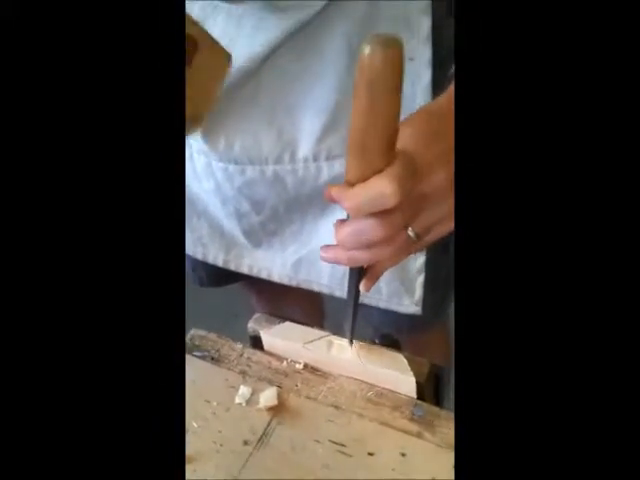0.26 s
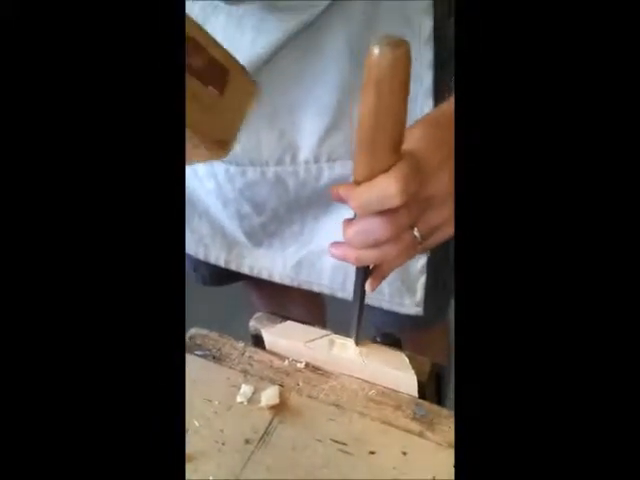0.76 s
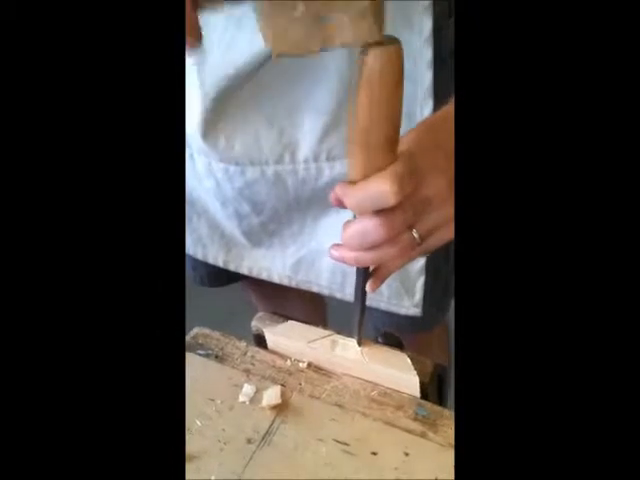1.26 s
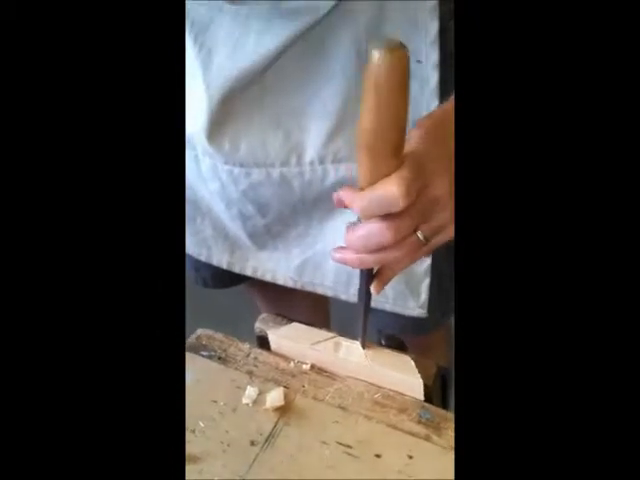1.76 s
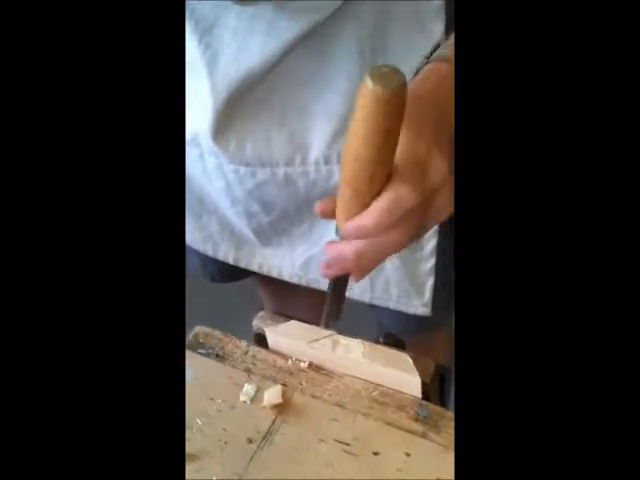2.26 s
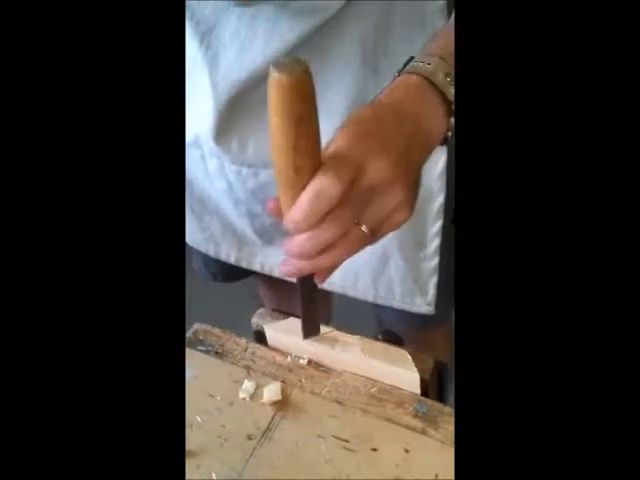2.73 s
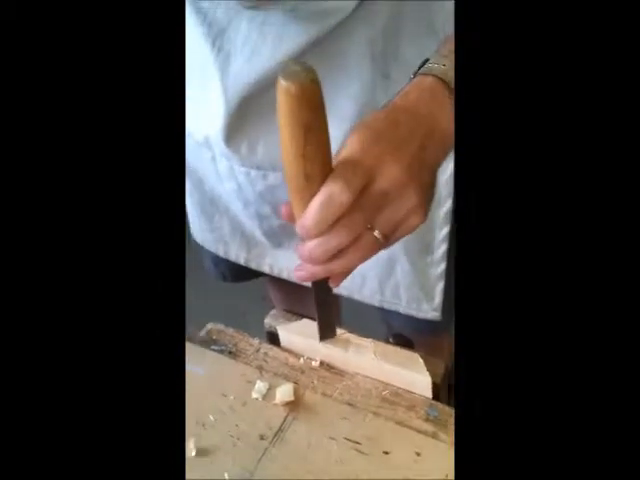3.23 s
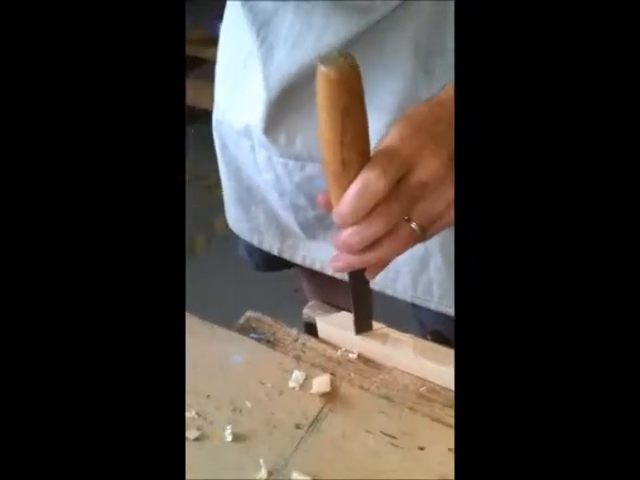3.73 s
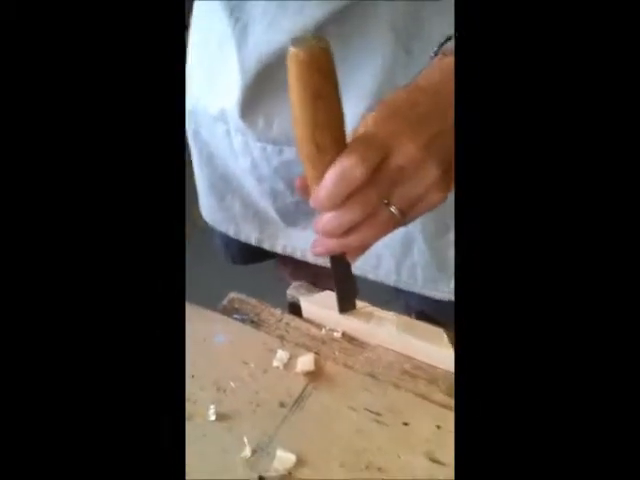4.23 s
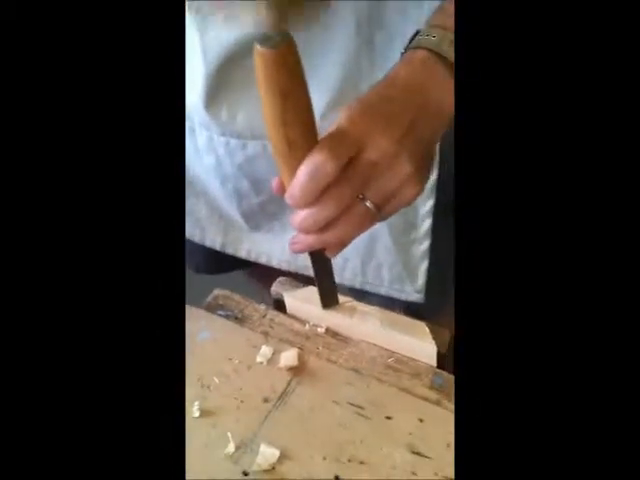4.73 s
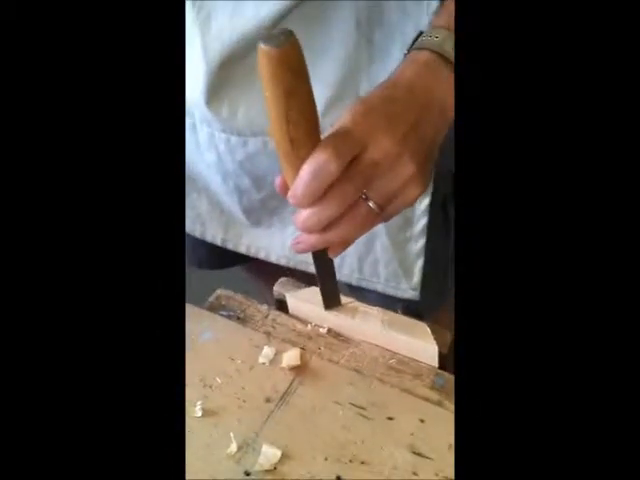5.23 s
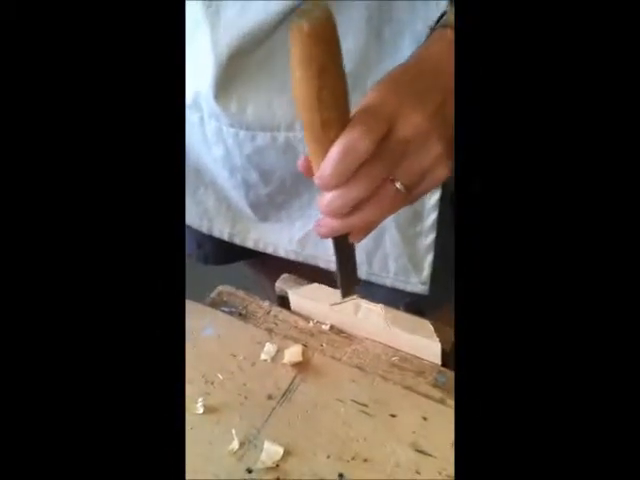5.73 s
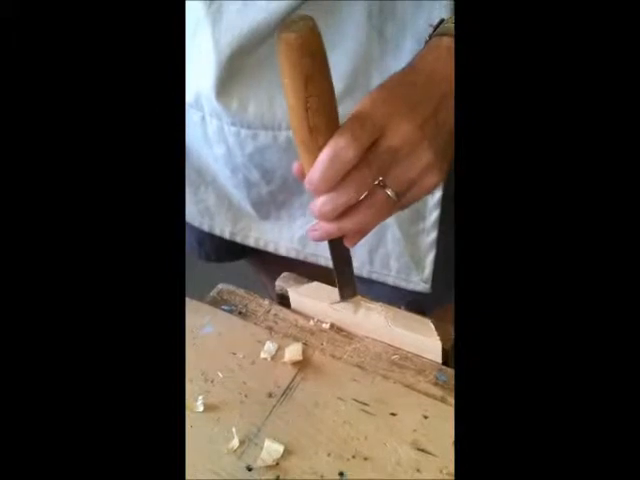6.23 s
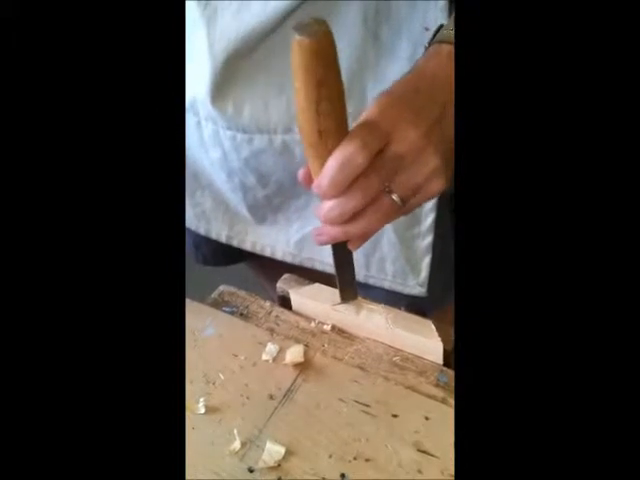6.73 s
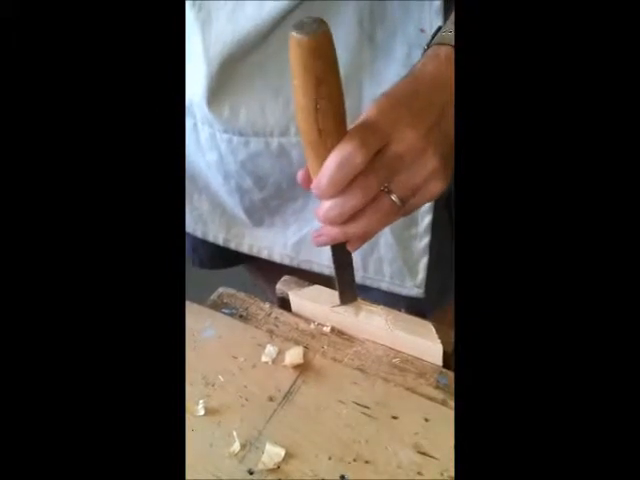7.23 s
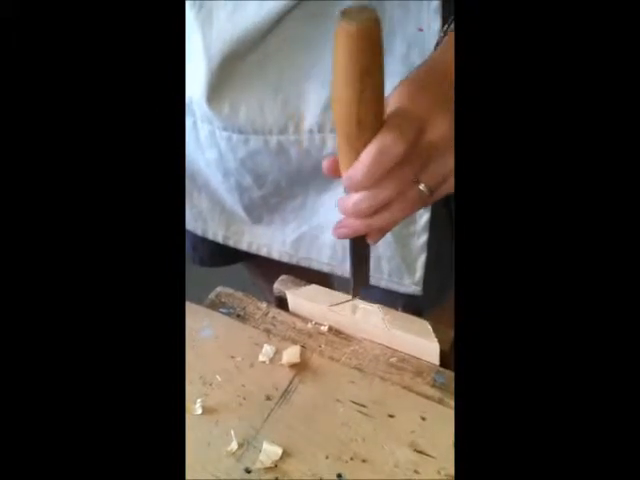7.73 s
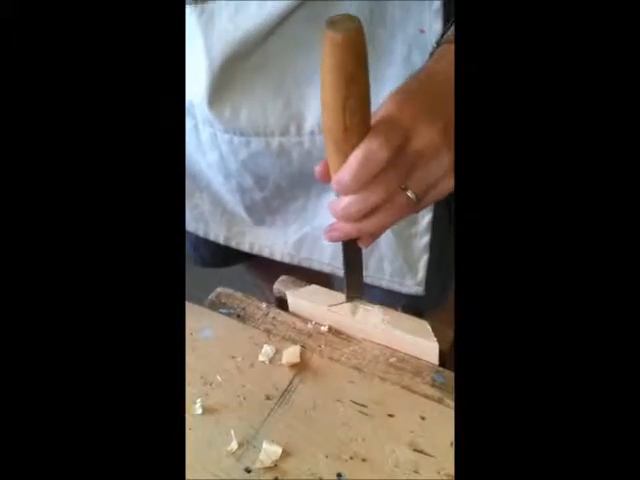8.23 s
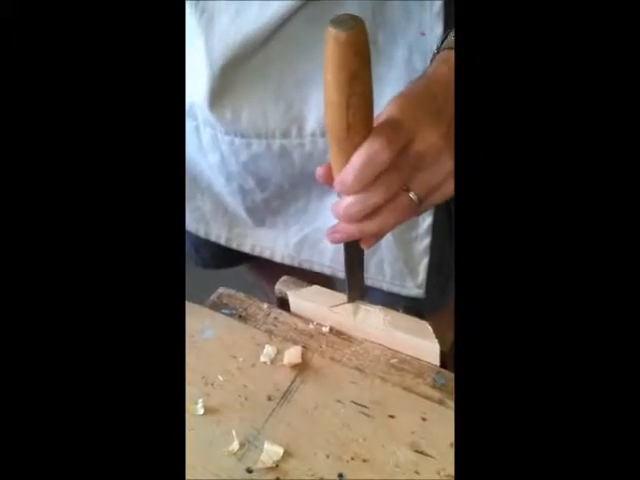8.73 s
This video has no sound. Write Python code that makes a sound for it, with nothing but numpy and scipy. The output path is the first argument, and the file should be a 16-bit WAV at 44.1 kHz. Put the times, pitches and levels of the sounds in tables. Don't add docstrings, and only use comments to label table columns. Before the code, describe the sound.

Hard mallet blows on a wooden chisel ring through a bench in an echoing little workshop, loudest peaks overdriven, soft tool taps between groups.

```python
import sys
import numpy as np
from scipy import signal
from scipy.fft import rfft, irfft, next_fast_len
from scipy.io import wavfile
from scipy.ndimage import uniform_filter1d

SR = 44100
rng = np.random.default_rng(int(sys.argv[2]) if len(sys.argv) > 2 else 0)


def materialize(psi):
    bounded = np.clip(np.atleast_2d(psi).T, -1, 1)
    quanta = np.round(bounded * 32767).astype(np.int16)
    wavfile.write(sys.argv[1], SR, quanta)


def level_to_linear(level):
    exponent = np.asarray(level, float) / 20
    return 10 ** exponent


N = 396018
LEAD = 8820


def blow(force_db, tilt_db):
    # [f/Hz, level/dB, time to fall 60 dB/s]
    wood_modes = [(139, -37, 0.11), (316, -0.5, 0.058), (400, -3, 0.077), (578, -13.5, .06),
                  (672, -6.5, 0.054), (817, -3, 0.063), (1075, -9, 0.034), (1615, -10, 0.0088),
                  (2700, -10, .03), (4540, -10, 0.013), (5500, -17, 0.012)]
    boom_db = -6.5 + 0.23 * force_db
    vary_db = 2.5
    wood = np.zeros(4096)
    for hz, db, t60 in wood_modes:
        shift, vary = rng.standard_normal(2)
        low_db = boom_db / (1 + (hz / 450) ** 4)
        mode = ring(hz * (1 + 0.015 * shift), t60 * 0.43, size=4096)
        wood += level_to_linear(db + low_db + vary_db * vary) * mode
    snap = crack(tilt_db, t60=0.0049, splinter_db=-17.5)
    return level_to_linear(force_db) * (level_to_linear(-2) * loaded(wood) + level_to_linear(19) * snap)


def crack(tilt_db, t60, splinter_db):
    t = np.arange(4096) / SR
    burst = rng.standard_normal(4096) * level_to_linear(splinter_db - 60 * t / t60)
    burst[4] = 0.78
    return coloured(burst, tilt_db)


def handle(force_db, shaft_hz, handle_db):
    # [f/Hz, level/dB]
    upper_rings = [(1580, 2.5), (3000, -0.5), (4050, -5)]
    shaft_db, shaft_t60, vary_db = 5, 0.017, 2.5
    handle_hz = 2300 + 0.47 * (shaft_hz - 880)
    rings = level_to_linear(handle_db + 7) * ring(handle_hz, t60=0.02, size=4096)
    rings += level_to_linear(shaft_db) * ring(shaft_hz, shaft_t60, size=4096)
    for hz, db in upper_rings:
        shift, vary = rng.standard_normal(2)
        rings += level_to_linear(db + vary_db * vary) * ring(hz * (1 + 0.02 * shift), shaft_t60, size=4096)
    return level_to_linear(force_db - 2) * loaded(rings)


def splinters(force_db, tilt_db):
    t = np.arange(2048) / SR
    fade = level_to_linear(-60 * (t / 0.02) ** 2) * np.clip(t / 0.0024, 0, 1)
    tear = rng.standard_normal((2, len(t))) * fade
    return level_to_linear(force_db - 1.5) * np.array([coloured(side, tilt_db - 0.5) for side in tear])


def buzz(loose):
    # [f/Hz, twin f/Hz, time to fall 60 dB/s]
    steel_pairs = [(3960, 4060, .09), (7636, 7574, .2), (12340, 12270, .19)]
    tight_db = (-38, -34, -40.5)
    added_db = (11.5, 17.5, 17)
    t = np.arange(16000) / SR
    clicks = (rng.random(len(t)) < 900 / SR) * rng.standard_normal(len(t))
    chatter_s = 0.066 + 0.07 * loose
    chatter = clicks / (1 + (t / chatter_s) ** 8)
    rattle_db = -21 + 8.5 * loose
    out = level_to_linear(rattle_db + 10.5) * coloured(chatter, -1.2)
    for db, more_db, (hz, twin_hz, t60) in zip(tight_db, added_db, steel_pairs):
        steel = ring(hz, t60, size=len(t)) + 0.6 * ring(twin_hz, t60, size=len(t))
        pair = signal.fftconvolve(chatter, steel)[:len(t)]
        out += level_to_linear(db + more_db * loose + 5) * pair / abs(pair).max()
    return out


def knock(db, hz, t60, tilt_db):
    rise = np.clip(np.arange(4096) / SR / 0.0005, 0, 1)
    body = rise * ring(hz, t60 * 0.56, size=4096)
    tick = crack(tilt_db, t60=0.0047, splinter_db=-26.5)
    return level_to_linear(db - 2.5) * (body + level_to_linear(10) * tick)


def add_vise_hum(mix):
    # [t/s, f/Hz, level/dB, time to fall 60 dB/s]
    iron_hum = (7.87, 447, -46, 2.5)
    s, hz, db, t60 = iron_hum
    add(mix, s, level_to_linear(db) * ring(hz, t60, size=SR + LEAD) * np.ones((2, 1)))


def in_room(dry, wet_db, early, count=440):
    # [f/Hz, time to fall 60 dB/s]
    room_t60 = [(70, 0.21), (130, 0.88), (260, 0.66), (700, 0.47), (1800, 0.53), (5000, 0.48), (8000, 0.5),
                (12000, 0.5)]
    # [f/Hz, likeness -1 to 1]
    room_same = [(60, .5), (160, 0.85), (300, 0.64), (600, 0.36), (1500, .1), (12000, 0.18)]
    hz, z = pair_noise(frames=count, size=256, same=room_same)
    t = np.arange(z.shape[-1]) * 64 / SR
    decay = level_to_linear(-60 * t / read(room_t60, hz)[:, None])
    near = 1 + early * np.exp(-t / 0.0072)
    tail = signal.istft(z * decay * near, nperseg=256, noverlap=192)[1]
    tail = level_to_linear(wet_db) * tail / np.linalg.norm(tail[0])
    tail[0, 0] = tail[1, 3] = 1
    return signal.fftconvolve(dry[None], tail, axes=1)


def floor():
    # [f/Hz, level/dB per Hz]
    floor_colour = [(18, -44.5), (53, -7), (87, -1.5), (220, -6.5), (260, -15.5), (420, -11), (750, -17),
                    (4910, -24.5)]
    # [f/Hz, likeness -1 to 1]
    floor_same = [(60, -0.65), (180, 0.79), (540, 0.21), (1640, 0.51), (4930, -0.16), (14900, 0.29)]
    # [f/Hz, left over right/dB]
    floor_lean = [(60, 1), (180, 4), (540, 2.5), (1640, 2), (4930, 1), (14900, 1)]
    hz, z = pair_noise(frames=N // 256 + 5, size=1024, same=floor_same)
    patches = rng.standard_normal(z.shape[:0:-1]).T
    patches = uniform_filter1d(patches, 12, 0)
    patches = evened(uniform_filter1d(patches, 30, 1))
    sides = np.array([0.5, -0.5])[:, None, None]
    level_db = read(floor_colour, hz)[:, None] + 1.1 * patches + read(floor_lean, hz)[:, None] * sides
    hiss = signal.istft(z * level_to_linear(level_db), nperseg=1024, noverlap=768)[1][:, :N]
    return level_to_linear(-57) * evened(hiss)


def coloured(x, tilt_db):
    # [f/Hz, level/dB per Hz]
    crack_colour = [(30, -56.5), (200, -16.5), (320, -2.5), (500, -12), (900, -3), (4000, -14),
                    (9500, -28.5), (15000, -47)]
    hz = np.fft.rfftfreq(4096, 1 / SR)
    octaves = np.log2(np.clip(hz, 150, 12000) / 1000)
    gain = np.log(level_to_linear(read(crack_colour, hz) + tilt_db * octaves))
    mirrored = np.r_[gain, gain[-2:0:-1]]
    causal = np.exp(np.conj(signal.hilbert(mirrored)))[:len(hz)]
    click = irfft(causal)
    return signal.fftconvolve(x, click / np.linalg.norm(click))[:len(x)]


def ring(hz, t60, size):
    t = np.arange(size) / SR
    return level_to_linear(-60 * t / t60) * np.sin(2 * np.pi * hz * t)


def loaded(x):
    return x * np.clip(np.arange(len(x)) / SR / 0.0012, 0, 1)


def pair_noise(frames, size, same):
    hz = np.fft.rfftfreq(size, 1 / SR)
    a, b, c, d = rng.standard_normal((frames, len(hz), 4)).T
    left, other = a + 1j * b, c + 1j * d
    same = np.clip(read(same, hz), -1, 1)[:, None]
    return hz, np.array([left, same * left + np.sqrt(1 - same ** 2) * other])


def evened(x):
    return x / np.sqrt(np.mean(x ** 2) + 1e-20)


def read(points, hz):
    f, value = np.transpose(points)
    return np.interp(np.log(hz + 1), np.log(f + 1), value)


def add(mix, s, sound):
    part = mix[:, round(s * SR) + LEAD:][:, :sound.shape[-1]]
    part += sound[:, :part.shape[1]]


def scene():
    # [t/s, force/dB, shaft ring f/Hz, handle knock level/dB, blade looseness 0-1]
    blows = [
        (-.115, 0.5, 972.6, -11, .15),
        (.2195, 3.5, 1078, -4.5, .05),
        (1.7678, -3, 1113, 5, .05),
        (2.0625, 1, 900, 4.5, 0.2),
        (5.207, -1.5, 879.4, 5, .1),
        (5.547, 3.5, 752, -9, 0.5),
        (5.8697, 6.5, 773, -12.5, 0.98),
        (7.499, 1.5, 810, -9, .45),
        (7.8554, 5, 750, -12, 1.0),
    ]
    # [t/s, level/dB, ring f/Hz, time to fall 60 dB/s, brightness/dB per octave]
    knocks = [(.840, -27.5, 416, 0.024, -4.5), (1.2, -39, 310, 0.058, -1), (3.712, -65, 253, 0.058, -13),
              (4.272, -23, 400, 0.078, -6), (4.273, -17.5, 1190, 0.019, -4.5),
              (4.273, -25.5, 2480, 0.045, 3.5), (4.285, -23, 1000, .045, -3), (6.555, -44, 397, 0.087, -3),
              (6.82, -45, 395, 0.18, 12), (7.934, -6, 477, 0.034, 2), (8.489, -37.5, 264.4, 0.08, -9)]
    # [t/s, level/dB, ring f/Hz]
    ticks = [(.971, -43, 1300), (.969, -49, 6100), (1.02, -45, 1400), (1.021, -48, 6300),
             (1.048, -44, 1450), (1.045, -51, 6300), (2.745, -53, 5800), (2.93, -50, 5800),
             (3.58, -50, 2400), (3.972, -48, 6100), (4.283, -36, 6000), (4.721, -44, 2300),
             (4.722, -47, 7300), (.845, -40, 1000), (5.921, -4, 5450), (7.548, -16, 5400),
             (7.905, -12, 5400)]
    # [f/Hz, left over right/dB]
    bench_lean = [(100, 8), (500, 2.5), (1200, 3.5), (4000, 5.5), (8000, -4.5), (12000, 0.35)]
    flight = 0.0013
    mix = np.zeros((2, N + LEAD))
    for s, force_db, shaft_hz, handle_db, loose in blows:
        s += flight
        tilt_db = 0.27 + 2.5 * loose
        add(mix, s, in_room(blow(force_db, tilt_db), 2, early=2.5))
        add(mix, s, in_room(handle(force_db, shaft_hz, handle_db), -7, early=2, count=340))
        add(mix, s, splinters(force_db, tilt_db))
        add(mix, s, in_room(buzz(loose), -5, early=1.8, count=320))
    for s, *how in knocks:
        add(mix, s + flight, in_room(knock(*how), 0, early=1.2, count=340))
    for s, db, hz in ticks:
        tilt_db = 1.8 * np.log2(hz / 2800)
        tick = knock(db, hz, 0.028, tilt_db)
        add(mix, s + flight, in_room(tick, -5, early=3, count=160))
    add_vise_hum(mix)
    high_pass = signal.butter(3, 140, "high", fs=SR, output="sos")
    mix = signal.sosfilt(high_pass, mix)
    size = next_fast_len(N + 2 * LEAD)
    lean_db = read(bench_lean, np.fft.rfftfreq(size, 1 / SR))
    lean = level_to_linear(lean_db * np.array([[0.5], [-0.5]]))
    return irfft(rfft(mix, size) * lean, size)[:, LEAD:LEAD + N] + floor()


def overloaded(x):
    low_pass = signal.butter(4, 14800, fs=SR, output="sos")
    return signal.sosfilt(low_pass, np.clip(x, -0.95, 0.95))


def thinned(x):
    # [f/Hz, level/dB]
    weak_limit = [(8800, -60), (9500, -30), (10600, -23), (12000, -25), (12300, -50), (12700, -25),
                  (14400, -25)]
    edge_hz, busy_db = 14500, -51
    hz, _, z = signal.stft(x, SR, nperseg=1024, noverlap=512)
    band = uniform_filter1d(abs(z) ** 2, size=13, axis=1)
    top = band.max(1, keepdims=True)
    busy = top > level_to_linear(2 * busy_db)
    sudden = top >= level_to_linear(2 * 9) * np.roll(top, 2, axis=2)
    settled = ~busy | ~sudden
    faint = band < top * level_to_linear(2 * read(weak_limit, hz))[:, None]
    weak = faint & (hz[:, None] > weak_limit[0][0]) & busy
    lost = settled & (weak | (hz[:, None] > edge_hz))
    return x - signal.istft(z * lost, SR, nperseg=1024, noverlap=512)[1][:, :N]


def band_limit(x):
    return signal.sosfilt(signal.butter(12, 15460, fs=SR, output="sos"), x)


def record(dry):
    mix = thinned(overloaded(dry))
    return band_limit(mix)


dry = scene()
out = record(dry)
materialize(out)
```